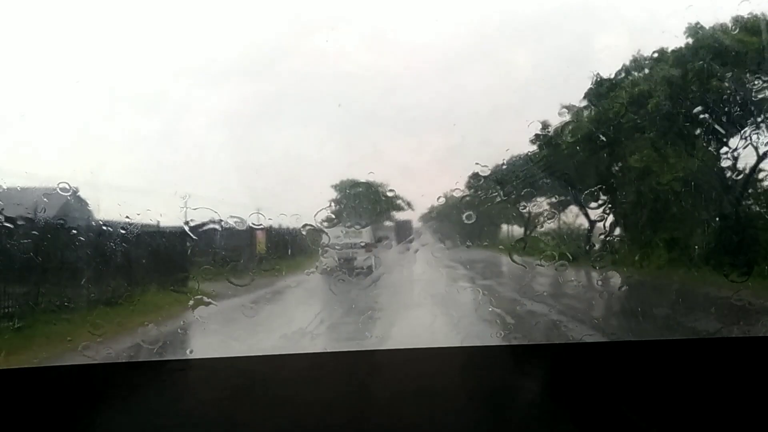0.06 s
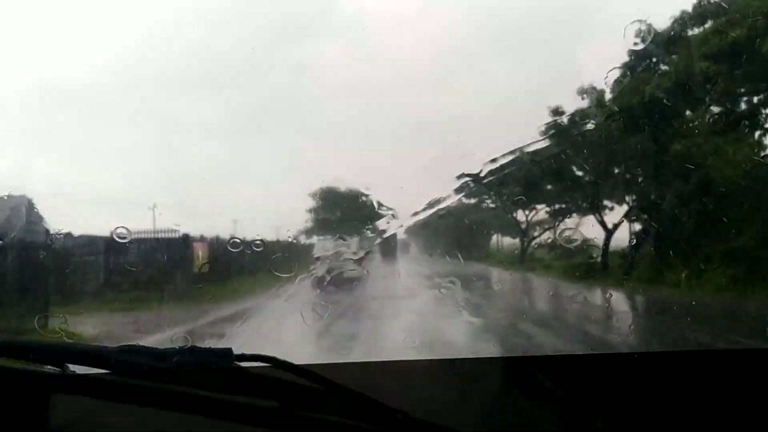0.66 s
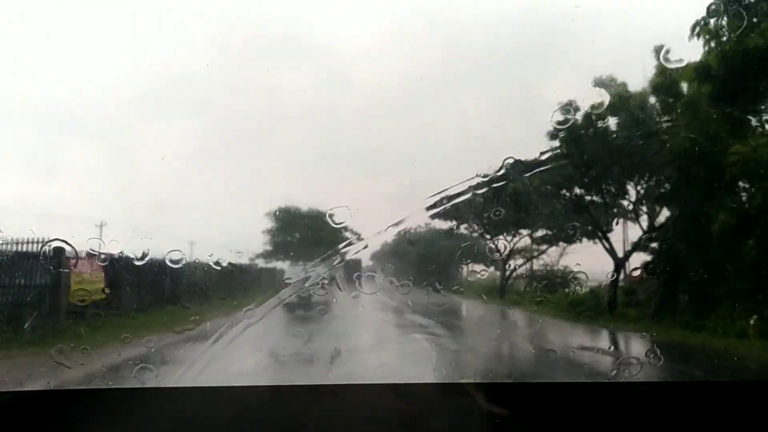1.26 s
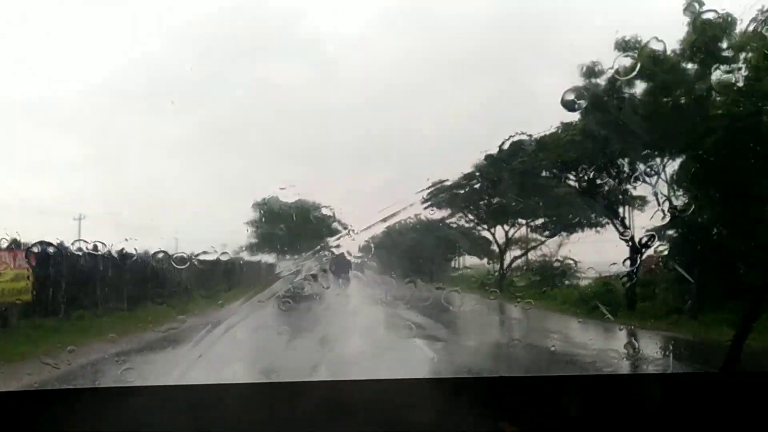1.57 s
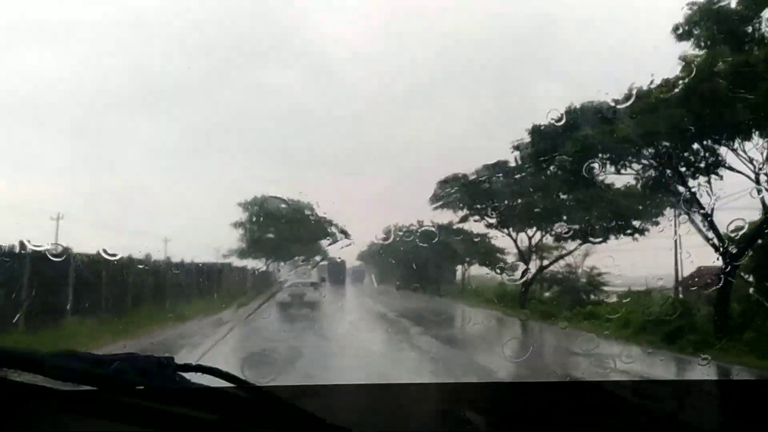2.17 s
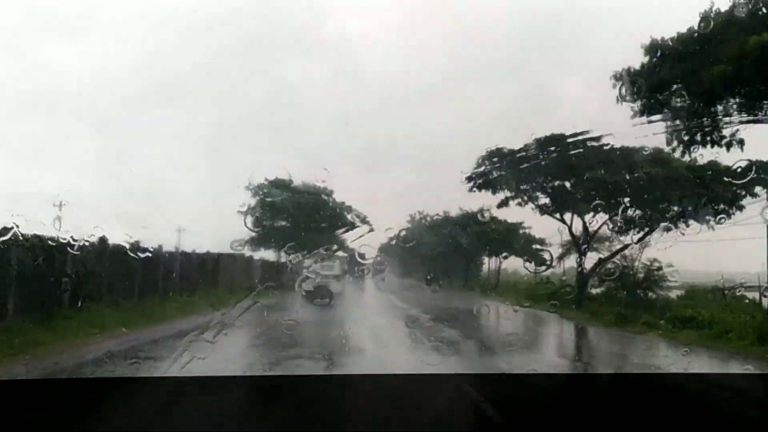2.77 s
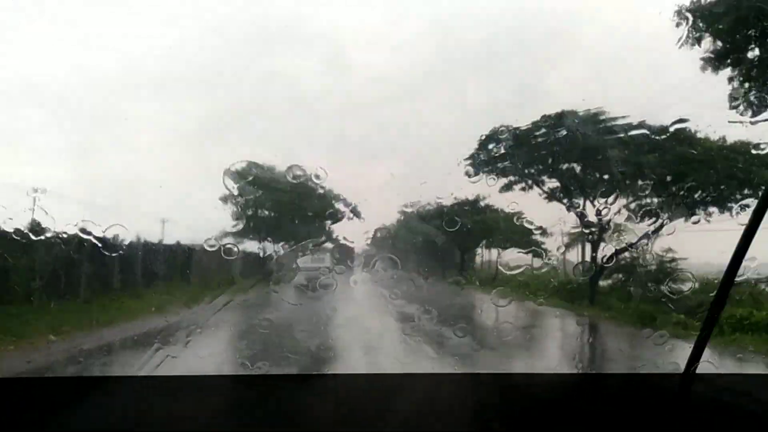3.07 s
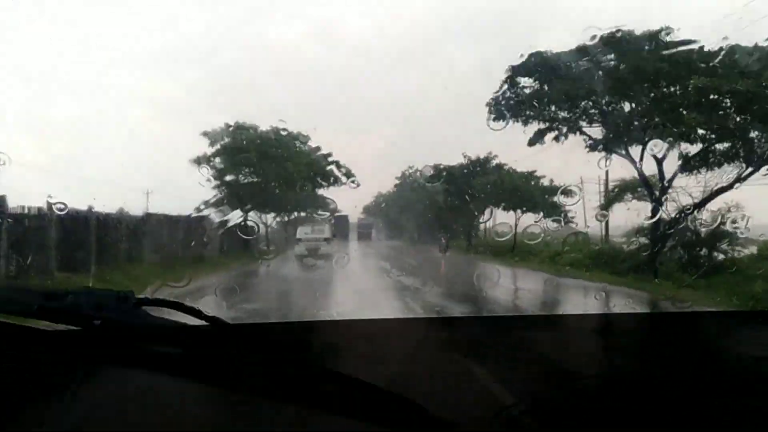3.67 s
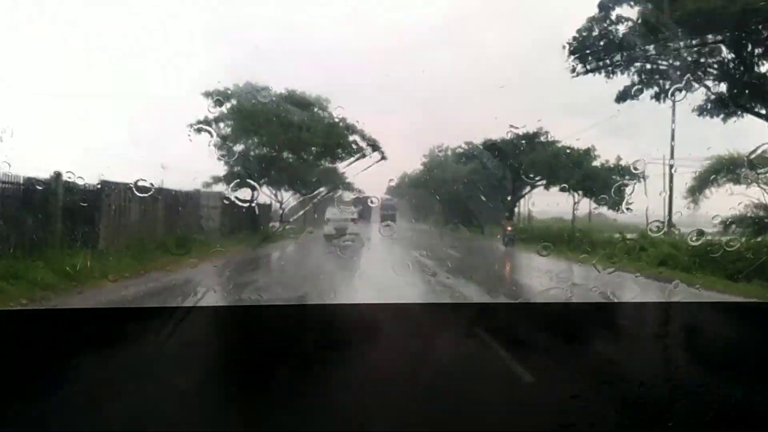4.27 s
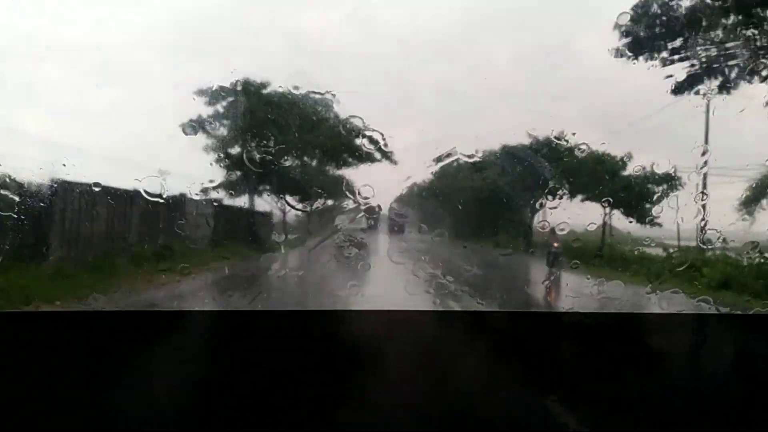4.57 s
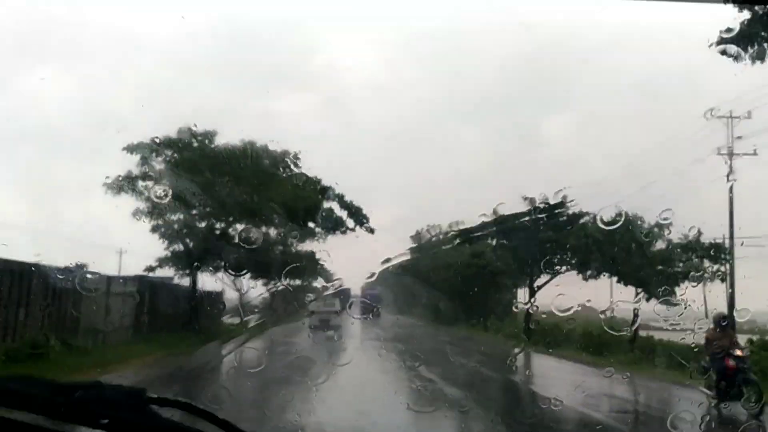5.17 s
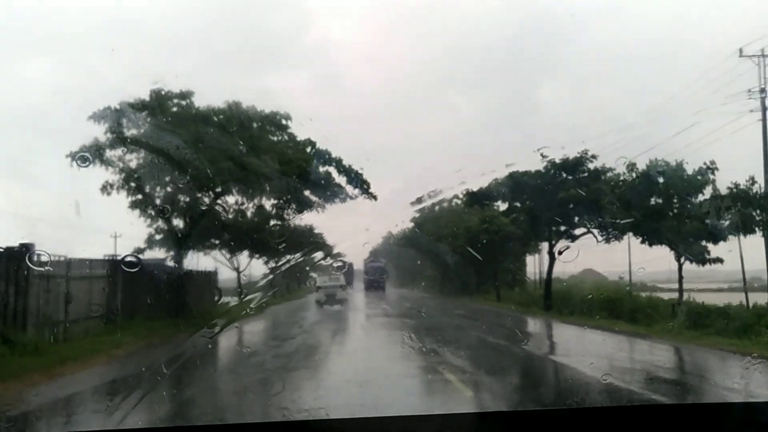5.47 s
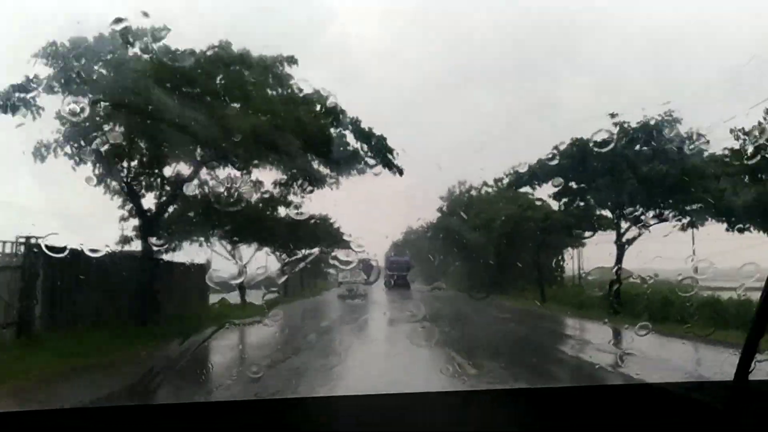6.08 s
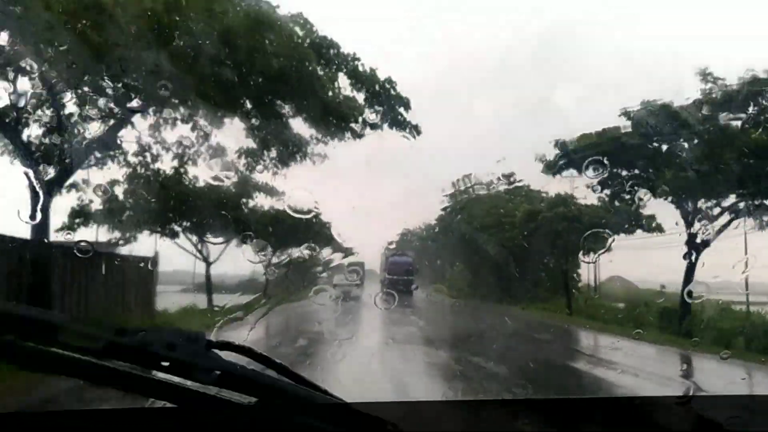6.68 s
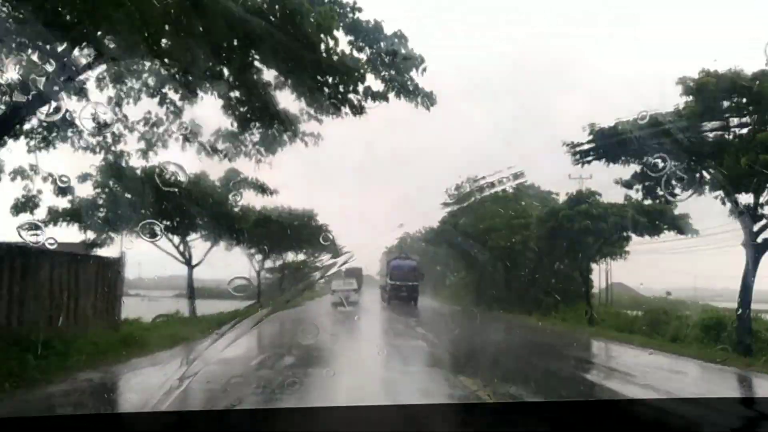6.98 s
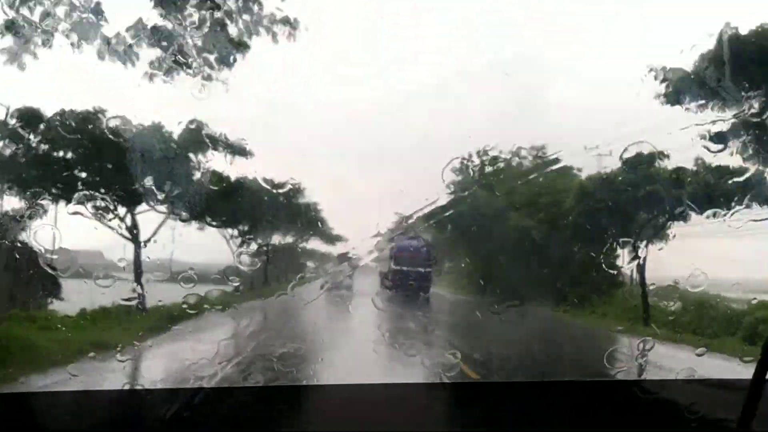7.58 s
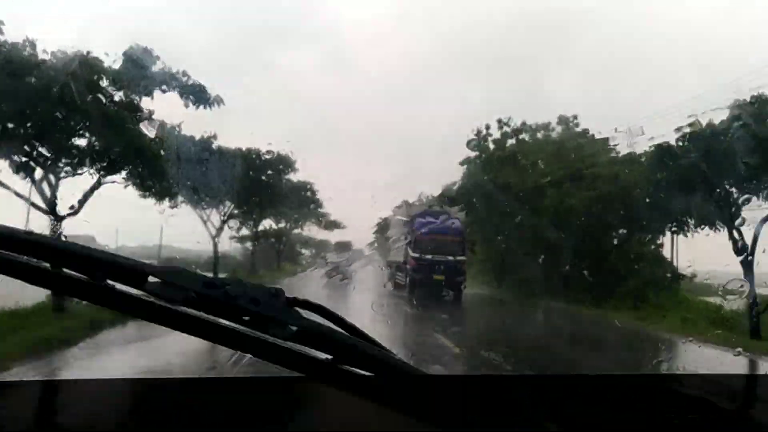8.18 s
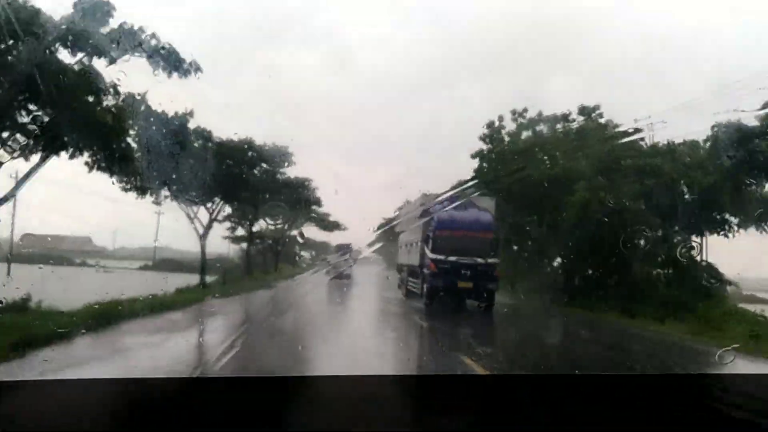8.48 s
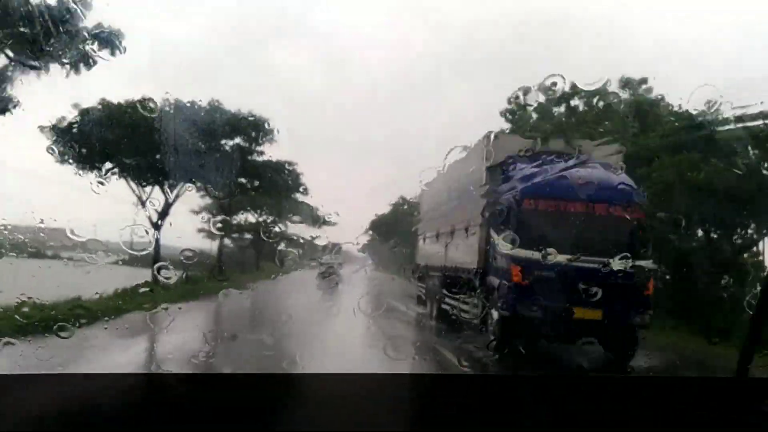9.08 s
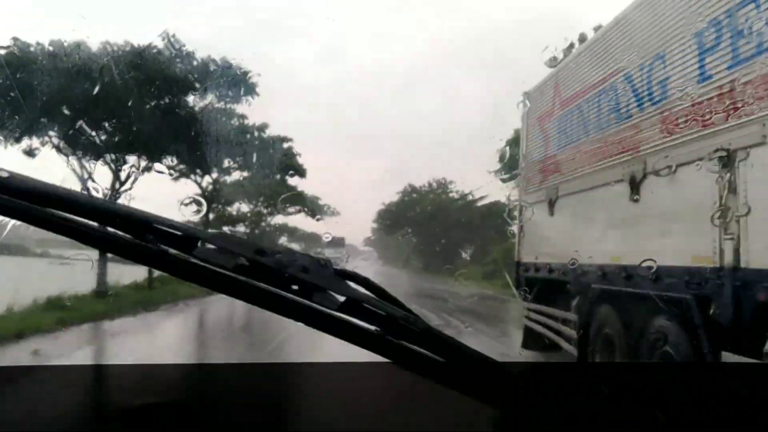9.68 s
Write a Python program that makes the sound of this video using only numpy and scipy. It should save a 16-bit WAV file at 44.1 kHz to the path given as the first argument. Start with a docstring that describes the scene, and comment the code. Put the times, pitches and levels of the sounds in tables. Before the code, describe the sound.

The sound is heard from the front seat of a car cruising on a wet road for about ten seconds. From the start, the engine holds a steady low boom, with faint ticking and a thin whine that comes and goes. Tyres rumble and hiss through the water, and fine rain patters on the windscreen throughout. A small splash touches the body at about 1.6 seconds, and the spray rises briefly around 3 and 4 seconds. From about 7 seconds the engine pulls a little harder and its boom starts to throb, most clearly after 9 seconds. The road rumble grows rougher between 7.5 and 9 seconds, and the spray swells slightly. Light splashes come at about 8.3 and 9.5 seconds, then two sharper slaps of water hit the body around 9.7 and 9.8 seconds.

```python
"""Inside a car cruising on a wet road in the rain. The four-cylinder engine booms at its firing rate and
clatters faintly through the bulkhead; near the end it picks up a little and the boom starts to throb.
Gears and alternator whine faintly. Tyres rumble and hiss, fine rain patters on the windscreen, a few
splashes slap the body, and the spray swells as the car comes up to a truck."""
import sys
import numpy as np
from scipy import signal
from scipy.fft import rfft, irfft, next_fast_len
from scipy.io import wavfile
from scipy.ndimage import map_coordinates

SR = 44100
rng = np.random.default_rng(int(sys.argv[2]) if len(sys.argv) > 2 else 0)


def to_wav(sig):
    """Store sig (one row per channel, or 1-D mono) as 16-bit WAV at the path in sys.argv[1].

    Samples outside -1..1 are clipped; the rate is SR.
    """
    pcm = np.clip(np.atleast_2d(sig), -1, 1) * 32767
    pcm = np.round(pcm).astype(np.int16)
    wavfile.write(sys.argv[1], SR, pcm.T)  # frames by channels


N = 434381
TIME_S = np.arange(N) / SR
FFT_SIZE = next_fast_len(N)
FREQ_HZ = np.maximum(np.arange(FFT_SIZE // 2 + 1) * SR / FFT_SIZE, 1)


def undb(db):
    """Decibels to gain."""
    return 10 ** (np.asarray(db) / 20)


def unit(x):
    """Scale to rms 1."""
    return x / np.sqrt(np.mean(x ** 2))


def pan(left_minus_right_db):
    """Left and right gains."""
    return undb(np.array([[.5], [-.5]]) * left_minus_right_db)


def noise():
    """Two independent white noises."""
    return rng.standard_normal((2, N))


def walk(rate_hz):
    """Smooth random drift, rms 1."""
    knots = rng.standard_normal(int(N / SR * rate_hz) + 4)
    fine = signal.resample_poly(knots, 16, 1)
    return unit(np.interp(TIME_S * rate_hz * 16, np.arange(len(fine)), fine))


def over_time(points):
    """Interpolate (time_s, value) points per sample."""
    return np.interp(TIME_S, *np.transpose(points))


def over_freq(points):
    """Interpolate (freq_hz, value) points per FFT bin, in log frequency."""
    freq_hz, value = np.transpose(points)
    return np.interp(np.log(FREQ_HZ), np.log(freq_hz), value)


def bell(peak_s, sigma_s):
    """Gaussian envelope, peak 1."""
    return np.exp(-.5 * ((TIME_S - peak_s) / sigma_s) ** 2)


def swells_db(table):
    """Sum of bell-shaped level rises."""
    return sum(boost_db * bell(peak_s, sigma_s) for peak_s, sigma_s, boost_db in table)


def filtered(x, response):
    """Apply a (freq_hz, gain_db) response."""
    return irfft(rfft(x, FFT_SIZE) * undb(over_freq(response)), FFT_SIZE)[..., :N]


def narrowband(turns, width_hz):
    """Tone spread into a band by random amplitude and phase."""
    angle = 2 * np.pi * turns
    return unit(walk(width_hz) * np.cos(angle) + walk(width_hz) * np.sin(angle))


def wavering(turns, rate_hz, slip_turns=.24):
    """Tone with slipping phase and fluttering level."""
    flutter = undb(1.8 * walk(2 * rate_hz))
    return unit(flutter * np.cos(2 * np.pi * (turns + slip_turns * walk(rate_hz))))


# Left-right coherence of the cabin field: freq_hz, correlation
CABIN_COHERENCE = [(80, 0.99), (120, 0.99), (220, 1), (285, -0.039), (340, 0.57), (450, 0.91),
                   (530, -0.072), (680, 0.41), (760, 0.74), (830, 0.084), (930, 0.42), (1080, -0.16),
                   (1350, -0.0068), (1620, -0.74), (1900, -0.21), (2500, -0.029), (3500, 0.0017)]

def cabin(pair, spectrum):
    """Coloured stereo field, rms 1; long waves reach both microphones alike."""
    correlation = np.clip(over_freq(CABIN_COHERENCE), -1, 1)
    coloured = rfft(pair, FFT_SIZE) * undb(over_freq(spectrum))
    mid, side = coloured * np.sqrt([1 + correlation, 1 - correlation])
    return unit(irfft(np.array([mid + side, mid - side]), FFT_SIZE)[:, :N])


# Weak engine tones: order (multiple of the cycle rate), level_db, left_minus_right_db
ENGINE_ORDERS = [(8, -39.5, 4.5), (10, -48, 0), (12, -32, -2.5), (16, -48.5, 15.5), (17, -48.5, -5),
                 (18, -62, -7), (20, -49.5, 0), (24, -49, -6), (34, -55.5, 7), (36, -58, -1), (38, -55, -5),
                 (40, -54, 6), (46, -58.5, -4)]

def engine_tones(cycles, load):
    """Four firings a cycle boom; under load the fifth order beats against them once a cycle."""
    def tone(order, level_db):
        # firing harmonics align into a pulse; other orders take random phases
        phase_turns = rng.random() * (order % 4 > 0)
        return np.sqrt(2) * undb(level_db) * np.cos(2 * np.pi * (order * cycles + phase_turns))
    boom = tone(order=4, level_db=-14 - 3.5 * load + .2 * walk(12))
    drone = pan(2) * tone(order=14, level_db=-29.5 + 5.9 * load + .6 * walk(5.4))
    throb = tone(order=5, level_db=-45 + 30 * load)
    tones = boom + throb + drone
    for order, level_db, side_db in ENGINE_ORDERS:
        tones += pan(side_db) * tone(order, level_db + walk(5.5))
    return tones


# Tick and knock spectra: freq_hz, relative_db
TICK_SPECTRUM = [(300, 0), (500, -2.5), (750, 9), (1100, -1.5), (1500, 7), (1800, 4.5), (2300, -15),
                 (3200, -21), (6000, -22), (12000, -36)]
KNOCK_SPECTRUM = [(1200, -17), (1800, 10), (2400, 4.5), (3200, -9), (6000, -18)]

def engine_clatter(cycles, ticks_per_cycle=8, pattern_size=3032):
    """Valves and injectors tick in a near-repeating pattern; one cylinder knocks harder."""
    phase_turns = cycles % 1
    patterns = rng.standard_normal((2, pattern_size))
    index = phase_turns * pattern_size
    repeating = np.array([map_coordinates(p, [index], order=3, mode="grid-wrap") for p in patterns])
    tick_envelope = undb(7 * np.cos(2 * np.pi * ticks_per_cycle * phase_turns))
    ticks = undb(-41) * cabin((repeating + .8 * noise()) * tick_envelope, TICK_SPECTRUM)
    knock = undb(-45.5) * cabin(noise() * np.exp(-phase_turns / .15), KNOCK_SPECTRUM)
    return undb(2.7 * walk(40)) * (ticks + knock)


# Alternator partials: cruise_pitch_hz, relative_db
ALTERNATOR_PARTIALS = [(5560, -2), (6670, 0), (7780, -5)]
# Whine swells: peak_s, sigma_s, boost_db
ALTERNATOR_SWELLS = [(1.1, 0.27, 7), (6.95, 0.2, 5), (8.6, .15, 5)]

def alternator(engine_clock_s, level_db=-60, width_hz=80):
    """Thin, rough whine that tracks engine speed and comes and goes."""
    def channel():
        return sum(undb(db) * narrowband(hz * engine_clock_s, width_hz) for hz, db in ALTERNATOR_PARTIALS)
    return undb(level_db + swells_db(ALTERNATOR_SWELLS)) * np.array([channel(), channel()])


# Gear hum and whine swells: peak_s, sigma_s, boost_db
GEAR_HUM_SWELLS = [(.95, .35, 6.5), (1.9, 0.22, 5), (3.45, .18, 2.5), (5.35, .17, 6), (6.1, 0.11, 2.5)]
GEAR_WHINE_SWELLS = [(.33, 0.09, 9), (1.4, 0.15, 5.5), (4.35, .12, 4), (5, 0.1, 10), (6.8, 0.12, 6.5),
                     (7.7, 0.22, 6.5), (8.35, 0.15, 8), (9.27, 0.092, 7.5), (9.7, .1, 6.5)]
# Shaft bands: cruise_pitch_hz, width_hz, relative_db, left_minus_right_db
SHAFT_BANDS = [(168.8, 5, -43.5, 6), (490, 20, -52, 5), (617, 14, -51, -8), (748, 30, -53, 8),
               (911.5, 24, -49, -3), (1600, 48, -55.5, -5), (1815, 70, -50.5, -11), (2425, 70, -54, -8)]

def drivetrain(engine_clock_s, load, hum_hz=338, whine_hz=732):
    """Gears and shafts sing in speed-tracking bands; load eases the hum and lifts the rest."""
    hum_db = -46.5 - 2.6 * load + swells_db(GEAR_HUM_SWELLS)
    hum = undb(hum_db) * wavering(hum_hz * engine_clock_s, rate_hz=5)
    whine_db = -48 + 2.9 * load + swells_db(GEAR_WHINE_SWELLS)
    whine = undb(whine_db) * wavering(whine_hz * engine_clock_s, rate_hz=10)
    shafts = sum(undb(db) * pan(side_db) * narrowband(hz * engine_clock_s, width_hz)
                 for hz, width_hz, db, side_db in SHAFT_BANDS)
    return hum + pan(1.2) * whine + undb(-.7 + 3 * load) * shafts


# Rough road stretches: peak_s, sigma_s, rumble_boost_db
ROUGH_ROAD = [(.3, 0.26, 3.5), (1.9, 0.22, 1), (4.45, 0.092, 1), (5.85, 0.12, 2.5), (7.5, 0.23, 2.5),
              (8.3, 0.32, 5), (9.1, 0.33, 2.3)]
# Body rumble and tread roar spectra: freq_hz, relative_db
RUMBLE_SPECTRUM = [(15, -8), (26, -13), (36, -2), (47, 3), (66, 5), (82, 4), (98, -1), (130, 3),
                   (160, -0.5), (210, -4.5), (280, -16), (420, -46.5)]
ROAR_SPECTRUM = [(120, -23), (190, 11.5), (235, 12), (275, 3.5), (330, 5), (400, -1.5), (480, 2), (550, -3),
                 (680, 1.5), (850, -1.5), (980, -4.5), (1200, -9.5), (2000, -37)]

def tyres(load):
    """The road shakes the body and the tread roars, both louder on rough stretches."""
    rough_db = swells_db(ROUGH_ROAD)
    rumble = undb(-29 + rough_db + .5 * walk(12)) * cabin(noise(), RUMBLE_SPECTRUM)
    roar_db = -33 + 1.5 * load + .31 * rough_db + 1.4 * walk(14)
    return rumble + undb(roar_db) * cabin(noise(), ROAR_SPECTRUM)


def reflections(pair, longest_s=.022, count=6, echo_gain=.11):
    """Short echoes off glass and dashboard ripple each channel's spectrum; rms 1."""
    lags = (rng.uniform(.0994, 1, (2, count)) * longest_s * SR).astype(int)
    echoes = np.array([sum(np.roll(x, lag) for lag in row) for x, row in zip(pair, lags)])
    return unit(pair + echo_gain * echoes)


# Water on the road: time_s, wetness_db
WETNESS = [(0, 1), (1.55, 1), (1.95, -0.7), (2.8, -1.6), (5.4, -0.6), (8.2, 1.5), (9.3, 1), (9.85, 2)]
# Extra spray from puddles: peak_s, sigma_s, boost_db
PUDDLE_SWELLS = [(3.07, 0.035, 3), (4, .4, 1.6), (9.7, 0.18, 1.3)]
# Spray and sizzle spectra: freq_hz, relative_db
SPRAY_SPECTRUM = [(600, -20), (1000, -1), (1300, -1.5), (1650, 2), (2300, 0), (2800, -6.5), (3500, -13.5),
                  (5000, -23.5), (9000, -43)]
SIZZLE_SPECTRUM = [(1800, -38), (2700, 1.5), (3200, 1), (4000, -3.5), (4700, -7), (6000, -28), (9000, -36)]

def wet_road():
    """Spray hisses in the wheel arches; the tread sizzles as it peels off the water film."""
    film_db = over_time(WETNESS) + .32 * walk(7)
    spray_db = -35 + film_db + swells_db(PUDDLE_SWELLS) + .24 * walk(14)
    spray = undb(spray_db) * reflections(cabin(noise(), SPRAY_SPECTRUM))
    sizzle_db = -42.5 + 1.2 * film_db + .24 * walk(18)
    sizzle = undb(sizzle_db) * reflections(filtered(noise(), SIZZLE_SPECTRUM))
    return spray + sizzle


def patter(spectrum, drops_per_s=3500, size_spread_db=2.5):
    """Dense small drops, a few larger, over an even wash; rms 1."""
    hits = rng.random((2, N)) < drops_per_s / SR
    sizes = undb(size_spread_db * np.minimum(rng.exponential(size=(2, N)), 4))
    impacts = undb(-7) * unit(hits * sizes * noise())
    return unit(filtered(impacts + noise(), spectrum))


# Heavier showers: peak_s, sigma_s, boost_db
SHOWER_SWELLS = [(0, .5, 2), (1.5, .3, 1.5), (3.1, 0.13, 1.2), (5.7, 0.23, 1.1), (9.8, 0.47, 2)]
# Drop and mist spectra: freq_hz, relative_db
DROP_SPECTRUM = [(2000, -12.5), (3800, -2.5), (4900, 1.5), (6000, 1), (7800, -1), (9000, -5.5),
                 (11000, -18), (14200, -24)]
MIST_SPECTRUM = [(5000, -26), (8000, -7), (9200, 2), (11000, 1.5), (12800, -5), (14200, -4)]

def rain():
    """Drops tick on the windscreen; the finest burst into a thin, flickering mist."""
    drops = undb(-44) * patter(DROP_SPECTRUM)
    mist = undb(-51.5 + .4 * walk(22)) * patter(MIST_SPECTRUM)
    gust_db = .33 * walk(7.7)
    return undb(swells_db(SHOWER_SWELLS) + gust_db) * (drops + mist)


# Water hitting the body: peak_s, sigma_s, level_db
SPLASH_HITS = [(1.625, .02, -41), (8.28, .03, -39), (9.48, .015, -38), (9.705, .013, -27.5),
               (9.783, .012, -30)]
# Splash spectrum: freq_hz, relative_db
SPLASH_SPECTRUM = [(500, -27), (1000, -6), (1500, 2), (2000, -1), (2700, -13), (4000, -15), (7000, -19),
                   (14000, -31)]

def splashes():
    """Sheets of water slap the body in short bursts."""
    envelope = sum(undb(level_db) * bell(peak_s, sigma_s) for peak_s, sigma_s, level_db in SPLASH_HITS)
    return envelope * cabin(noise(), SPLASH_SPECTRUM)


# Engine speed: time_s, firing_hz
FIRING_RATE = [(0, 58.68), (1.4, 58.5), (2.1, 58.14), (4.4, 57.85), (5.6, 57.97), (7.6, 58.27), (9.3, 58.8),
               (9.85, 59.03)]
# Engine pull: time_s, load_fraction
ENGINE_LOAD = [(0, 0.1), (1.4, 0.11), (3, 0), (5, .1), (6.7, 0.2), (7.5, 0.5), (8, 0.15), (9, .58),
               (9.4, 0.66), (9.85, 0.87)]
CRUISE_FIRING_HZ = 58.2

def scene():
    """Engine, drivetrain, tyres and water from the front seat."""
    firing_hz = over_time(FIRING_RATE)
    load = over_time(ENGINE_LOAD)
    cycles = np.cumsum(firing_hz) / SR / 4  # four firings per four-stroke cycle
    engine_clock_s = np.cumsum(firing_hz / CRUISE_FIRING_HZ) / SR  # real time at cruise speed
    engine = engine_tones(cycles, load) + engine_clatter(cycles) + alternator(engine_clock_s)
    surges = undb(.67 * walk(24))
    water = surges * (wet_road() + rain())
    return engine + drivetrain(engine_clock_s, load) + tyres(load) + water + splashes()


# Right microphone response: freq_hz, gain_db
RIGHT_MIC_RESPONSE = [(100, 0), (900, .5), (1500, 0.5), (3000, 1), (4300, -0.5), (5500, 2.5), (6700, 5.5),
                      (7700, 3.5), (8700, -2), (9400, -17), (10100, -20), (10800, -14), (12500, -10.5),
                      (14200, -14)]

def record(dry, fade_s=.005, cutoff_hz=14250):
    """Phone whose right microphone peaks in the treble and is dull above; end fades, steep low-pass."""
    to_edge_s = np.minimum(TIME_S, TIME_S[-1] - TIME_S)
    left, right = dry * np.minimum(to_edge_s / fade_s, 1)
    mics = np.array([left, filtered(right, RIGHT_MIC_RESPONSE)])
    lowpass = signal.ellip(12, .2, 80, cutoff_hz, fs=SR, output="sos")
    return signal.sosfilt(lowpass, mics)


dry = scene()
out = record(dry)
to_wav(out)
```